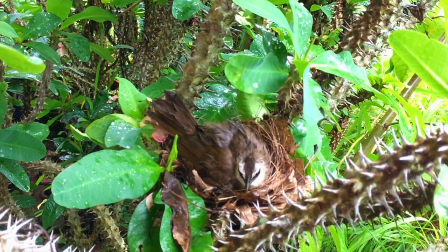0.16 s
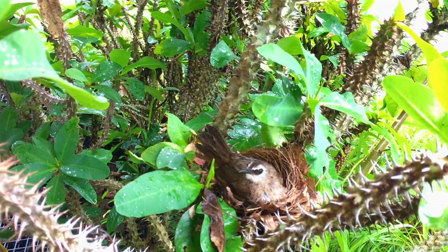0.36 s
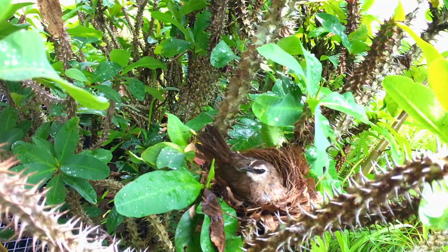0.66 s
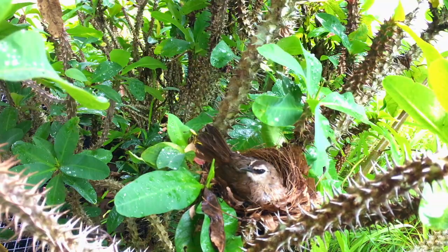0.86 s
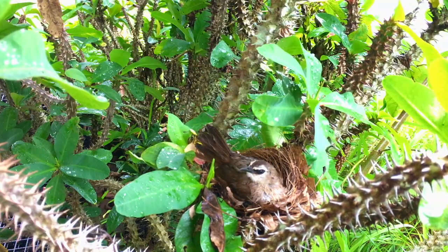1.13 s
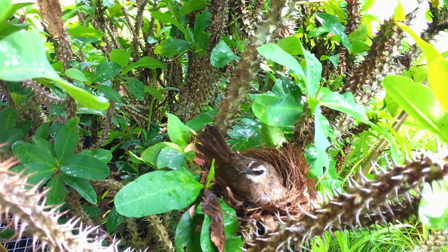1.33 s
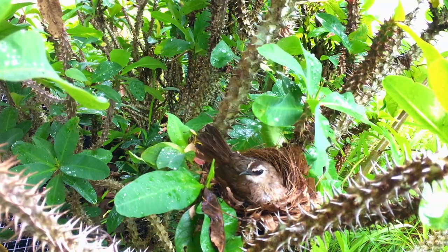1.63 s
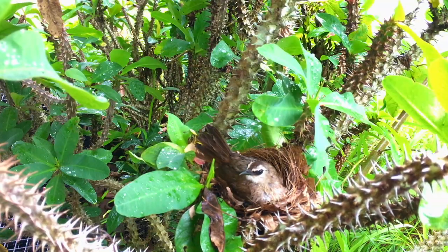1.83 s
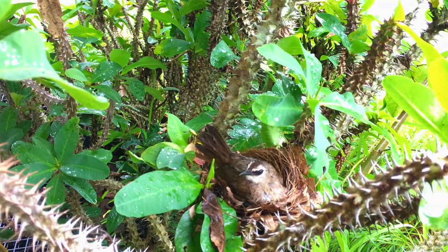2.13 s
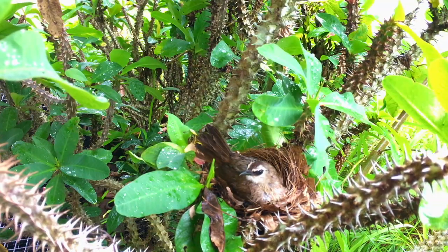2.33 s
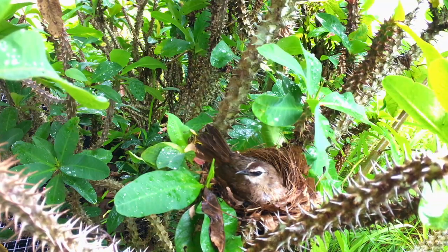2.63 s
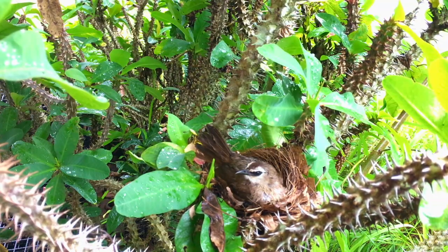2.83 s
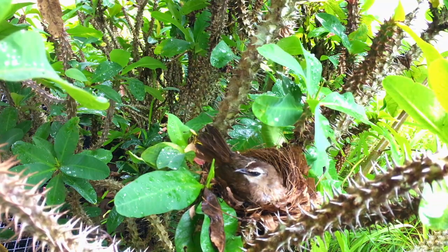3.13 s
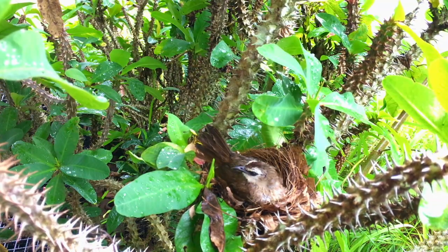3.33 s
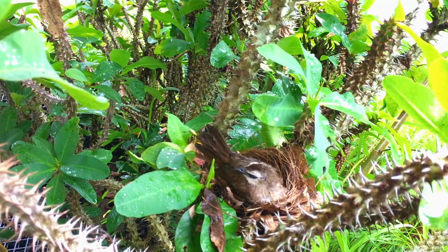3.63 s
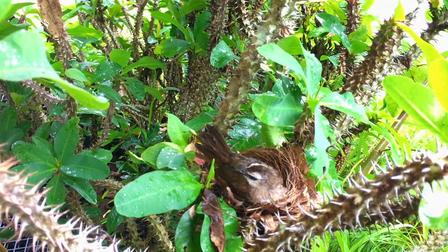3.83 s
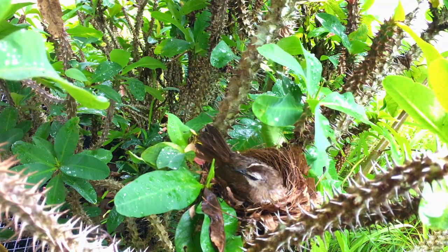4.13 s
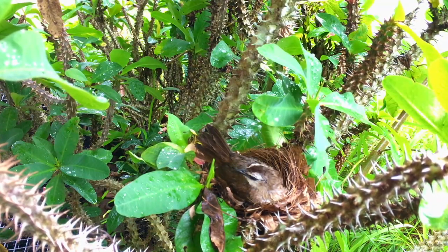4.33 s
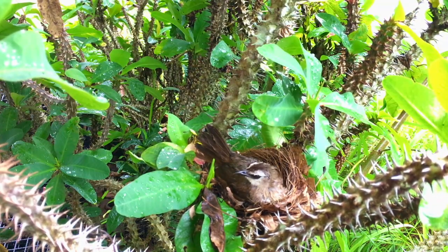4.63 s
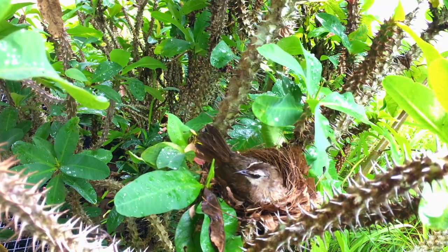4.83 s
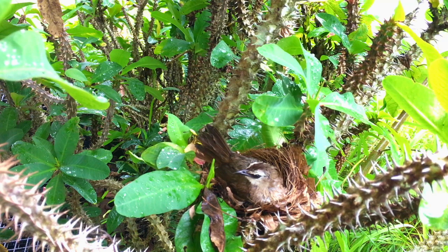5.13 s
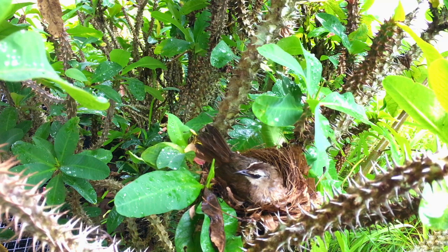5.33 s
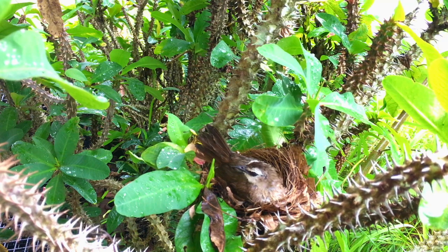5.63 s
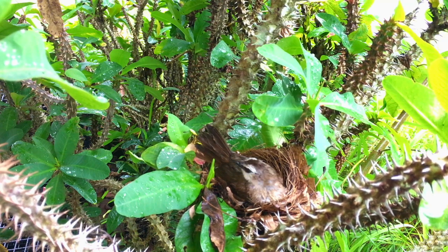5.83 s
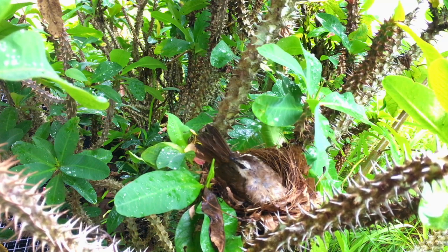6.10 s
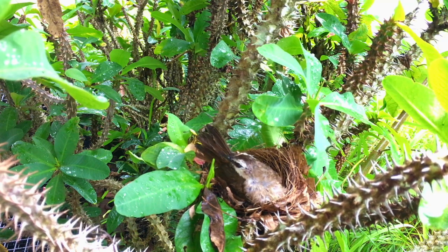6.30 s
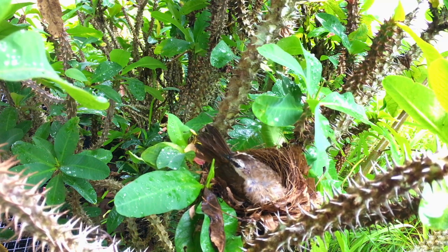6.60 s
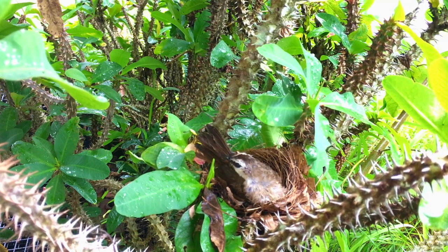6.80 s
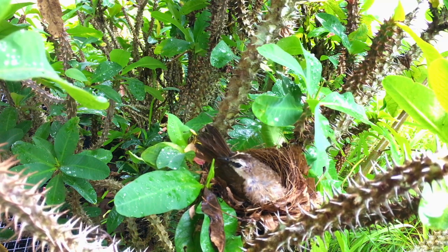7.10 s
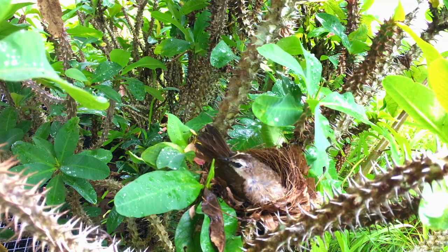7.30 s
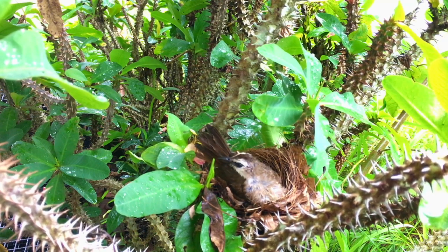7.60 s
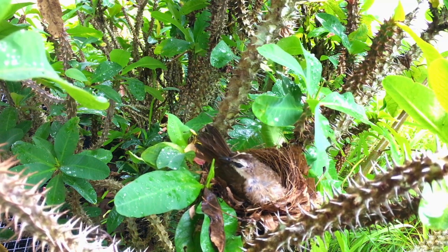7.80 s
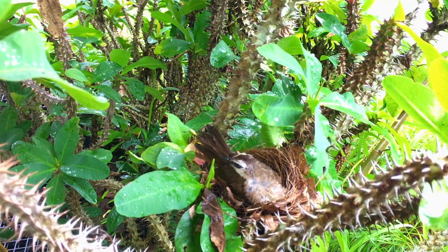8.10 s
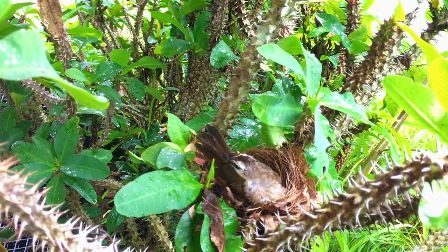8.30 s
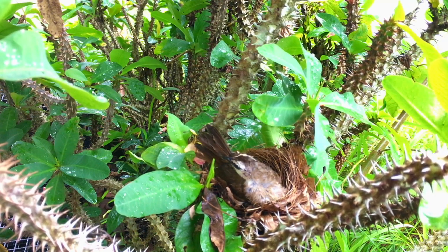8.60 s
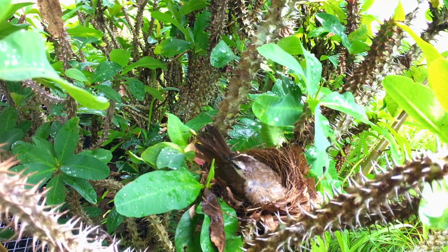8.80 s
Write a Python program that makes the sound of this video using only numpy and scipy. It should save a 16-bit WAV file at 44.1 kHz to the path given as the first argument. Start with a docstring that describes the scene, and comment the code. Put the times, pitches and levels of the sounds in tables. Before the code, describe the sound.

A microphone close among wet foliage picks up continuous rain: fine airy hiss, many tiny patters, and sharper nearby drops cracking on single leaves. Heavier drips thump softly at random. Far low town rumble stays faint underneath. Every couple of seconds a small distant bird slides up to a short piercing whistle; a rough, throaty double rasp closes the scene.

```python
"""Steady rain on a leafy shrub, heard from close by: a bright hiss over a low town rumble, with ticks and thuds.
Near drops tick on single leaves as a damped ring, a burst of spray noise and an after-patter; fat drips thud
on the ground and stems as short low swings. Far rain and rumble are shaped noise with slow level changes.
A small bird some way off whistles as gliding sines, and noise through throat resonances rasps at the end."""
import sys
import numpy as np
from scipy import signal
from scipy.fft import rfft, irfft
from scipy.io import wavfile
from scipy.ndimage import uniform_filter1d

SR = 44100
rng = np.random.default_rng(int(sys.argv[2]) if len(sys.argv) > 2 else 0)


def boost_factor(decibels):
    """Convert a level in decibels to a linear amplitude factor."""
    exponent = np.asarray(decibels, float) / 20
    return 10 ** exponent


def put_to_file(sound):
    """Save the sound as 16-bit audio at rate SR, in the file named by the first command-line argument."""
    columns = np.atleast_2d(sound).T  # one column per channel
    safe = np.clip(columns, -1, 1)
    whole_steps = np.round(safe * 32767)
    wavfile.write(sys.argv[1], SR, whole_steps.astype(np.int16))


N = 394694

# level changes of the far rain and of the middling drops: start_s, far_rain_db, middling_change_db
RAIN_LEVELS = [(0.0, -40.5, 7.5), (0.6, -42.5, -4), (0.84, -42.5, 3.5), (1.67, -41.5, -1), (1.89, -41.5, 5),
               (2.24, -42.5, -1), (3.01, -39, 13), (3.21, -41.5, -5), (4.29, -43.5, 0), (4.56, -42, 1),
               (4.86, -43.5, 2), (5.41, -42, 0), (6.61, -43, 0.5), (6.93, -40.5, 0.5), (7.53, -40, 0),
               (7.85, -42, 0), (8.2, -41, 0), (8.6, -43.5, -5.5), (8.95, -40.5, -1)]
# colour of the hiss as the microphone hears it, shared by far and near rain: frequency_hz, relative_density_db
HISS_COLOUR = [(320, -113), (540, -10), (650, -7), (1010, -3), (1430, -4), (3280, -0.5), (4820, -4),
               (6510, 0.5), (7620, -2.5), (9440, 0), (10400, -4), (12400, 1.5), (14700, -1.5), (15700, -2),
               (16500, -13.5)]
SPLASH_S = 0.08  # room for each short sound


def response(points, f):
    """Frequency response: gain at f Hz, interpolated in dB over log frequency."""
    hz, db = np.transpose(points)
    return boost_factor(np.interp(np.log(f + 1), np.log(hz), db))


def coloured(points):
    """Spectral shaping: white noise weighted by the given spectrum, at rms 1."""
    gain = response(points, np.fft.rfftfreq(N, 1 / SR))
    x = irfft(rfft(rng.standard_normal(N)) * gain, N)
    return x / np.std(x)


def walk(rate):
    """Slow random modulation: levels held 1 / rate s and smoothed twice; spread 1."""
    k = int(SR / rate)
    steps = np.repeat(rng.standard_normal(N // k + 1), k)
    x = uniform_filter1d(uniform_filter1d(steps, k), k)[:N]
    return x / np.std(x)


def fade(t, t60):
    """Exponential damping: a fall of 60 dB in t60 s."""
    return np.exp(-np.log(1000) * t / t60)


def scatter(s, sounds):
    """Superposition: each short sound is added in at its own time."""
    at = (np.asarray(s) * SR).astype(int)[:, None] + np.arange(sounds.shape[1])
    return np.bincount(at.ravel(), sounds.ravel(), N + SR)[:N]


def filtered(noise, gain):
    """Linear filtering: each row of noise takes its own gain over frequency, at rms 1."""
    x = irfft(rfft(noise) * gain, noise.shape[1])
    return x / np.std(x, axis=1, keepdims=True)


def lumps(rows, size, count, db):
    """Random unevenness: per row a smooth gain with count lumps, spread db at the knots; mean power 1."""
    knots = rng.standard_normal((rows, count + 1))
    at = np.linspace(0, count, size, endpoint=False)
    k = at.astype(int)
    gain = boost_factor(db * (knots[:, k] * (1 - at + k) + knots[:, k + 1] * (at - k)))
    return gain / np.sqrt(np.mean(gain ** 2))


def far_rain():
    """Incoherent summation: countless distant drops merge into a hiss that flickers with gusts of rain."""
    s, db, _ = np.transpose(RAIN_LEVELS)
    flicker_db = 0.8 * walk(16)
    return coloured(HISS_COLOUR) * boost_factor(np.interp(np.arange(N) / SR, s, db) + flicker_db)


def rumble():
    """Low-pass propagation: of distant traffic and rain on roofs, only the bass arrives."""
    # slow swell: start_s, level_db
    town_swell = [(0, -55), (4, -53.5), (8.95, -54)]
    # colour of the rumble: frequency_hz, relative_density_db
    town_colour = [(21, -36), (36, -10), (60, 2), (86, 0.5), (150, -7.5), (520, -18), (680, -31),
                   (1140, -120)]
    s, db = np.transpose(town_swell)
    return coloured(town_colour) * boost_factor(np.interp(np.arange(N) / SR, s, db))


def thud(s, db, hz, decay_s):
    """Heavily damped resonance: a soft contact gives a few low swings that soon blur into noise."""
    t = np.arange(int(SPLASH_S * SR)) / SR
    f = np.fft.rfftfreq(len(t), 1 / SR)
    hz = hz[:, None]
    resonance = 1 / (1 + (1.17 * (f / hz - hz / (f + 1))) ** 2)
    wobble = filtered(rng.standard_normal((len(s), len(t))), resonance)
    tone = np.sin(2 * np.pi * hz * t) * fade(t, 0.81 * decay_s)
    swing = tone + boost_factor(-5.0) * wobble * fade(t, 3.6 * decay_s)
    onset = 1 - np.exp(-t / 0.00022)  # swells within about a millisecond
    return scatter(s, boost_factor(db)[:, None] * swing * onset * (1 - t / SPLASH_S))


def drips():
    """Impact response: fat drips close by over a soft thump of the ground, and a crowd of fainter ones."""
    # the loudest fat drips: start_s, level_db, pitch_hz
    fat_drips = [(0.024, -44, 720), (0.366, -32, 925), (0.601, -41.5, 940), (1.244, -32, 920),
                 (1.416, -34.5, 931), (1.568, -34.5, 1610), (1.669, -39, 1330), (1.791, -32, 845),
                 (1.838, -36.5, 1620), (1.87, -43, 1570), (2.393, -41, 1460), (2.716, -42, 1120),
                 (2.963, -39, 649), (3.05, -40, 1340), (3.167, -37.5, 1560), (3.254, -38.5, 1060),
                 (3.542, -38, 622), (3.957, -37, 960), (4.251, -35, 920), (4.385, -37, 1030),
                 (4.425, -35, 880), (4.664, -39, 875), (4.816, -38, 1000), (5.119, -40, 860),
                 (5.227, -42, 910), (5.353, -39, 1020), (5.479, -29.5, 660), (5.541, -35.5, 1120),
                 (5.653, -35.5, 1020), (5.836, -38, 1060), (6.473, -37, 900), (6.612, -37, 654),
                 (7.046, -36, 700), (7.801, -37, 1010), (7.823, -38.5, 1080), (8.139, -33, 1550),
                 (8.569, -40.5, 894), (8.641, -38, 872), (8.839, -37, 1020), (8.901, -32.5, 1530),
                 (8.926, -36, 1200)]
    crowd_size = 500
    thump_hz, thump_db, thump_decay_s = 290, -15, 0.043  # lowest-to-highest scatter is drawn around these
    s, db, hz = np.transpose(fat_drips)
    u = rng.random((crowd_size, 2)).T
    e = rng.exponential(1, crowd_size)
    crowd_db = -51 + 2.5 * np.minimum(e, 3.0)
    crowd = thud(u[0] * N / SR, crowd_db, 640 * 2.35 ** u[1], 0.027)
    g = rng.standard_normal((len(s), 2)).T
    # each thump has its own level against the drip and its own pitch
    thump = thud(s, db + thump_db + 3.8 * g[0], thump_hz * 1.2 ** g[1], thump_decay_s)
    high_pass = signal.butter(4, 570, "high", fs=SR, output="sos")
    return signal.sosfilt(high_pass, thud(s, db, hz, 0.024) + crowd) + thump


def splash(s, hz, ring_db, spray_db, fine_db, patter_db, hit_t60, patter_t60, q):
    """Impact excitation: a drop jolts the leaf, which rings briefly; water bursts into spray and patters after."""
    spray_from_hz, fine_from_hz, fine_top_hz = 4500, 9050, 16000
    t = np.arange(int(SPLASH_S * SR)) / SR
    f = np.fft.rfftfreq(len(t), 1 / SR)
    hz = hz[:, None]
    noise = rng.standard_normal((len(s), len(t)))
    # a sharp crack at first contact, then the water spreads
    hit = (fade(t, hit_t60) + boost_factor(-3) * fade(t, 0.003)) * (1 - np.exp(-t / 0.0001))
    patter = boost_factor(patter_db)[:, None] * fade(t, patter_t60) * (1 - t / SPLASH_S) * (1 - np.exp(-t / 0.0027))
    # droplets fall back unevenly, coarse and fine ones at their own moments
    coarse, medium, mist = (np.hypot(hit, patter * lumps(len(s), len(t), count=48, db=1.5)) for _ in range(3))
    # every splash has its own patchy colour on top of the microphone's shared colour
    colour = response(HISS_COLOUR, f) * lumps(len(s), len(f), count=16, db=2.8)
    # the membrane's first swings are clean, then the wet surface blurs them
    clean = np.exp(-t * hz / 1.6)
    resonance = 1 / np.hypot(1, q * (f / hz - hz / (f + 1)))
    flutter = filtered(noise, colour * (f < spray_from_hz) * resonance)
    snap = boost_factor(9.0) * np.sin(2 * np.pi * hz * t) * clean
    leaf = snap + boost_factor(-1.0) * flutter * np.sqrt(1 - clean ** 2) * coarse
    spray = filtered(noise, colour * (f > spray_from_hz) * (f < fine_from_hz)) * medium
    fine = filtered(noise, colour * (f > fine_from_hz) * (f < fine_top_hz)) * mist
    ring_gain, spray_gain, fine_gain = (boost_factor(db)[:, None] for db in (ring_db, spray_db, fine_db))
    out = scatter(s, ring_gain * leaf + spray_gain * spray + fine_gain * fine)
    # a leaf is too small to radiate bass
    return signal.sosfilt(signal.butter(3, 1450, "high", fs=SR, output="sos"), out)


def patter_of(ring_db, spray_db, fine_db):
    """Compressive scaling: the harder the impact, the further its after-patter stays below it."""
    patter_db, reference_db, spread_db = -2.5, -33.5, 1.5
    slope = 0.37  # dB lost for each dB louder than the reference
    loudest = np.max([ring_db, spray_db, fine_db], axis=0)
    return patter_db - slope * (loudest - reference_db) + spread_db * rng.standard_normal(len(loudest))


def near_drops():
    """Random arrivals on the closest leaves: the loudest drops amid middling ones, louder and softer by turns."""
    # the loudest near drops: start_s, pitch_hz, ring_db, spray_db, fine_spray_db
    loud_drops = [(0.089, 2900, -35, -53, -49), (0.1125, 2950, -37, -23, -11.5),
                  (0.1398, 4600, -39, -30, -25), (0.227, 4370, -38, -50, -36),
                  (0.3371, 2390, -22.5, -28.5, -29), (0.3783, 2190, -51, -46, -35),
                  (0.4024, 2720, -30.5, -27, -28), (0.5076, 1590, -51, -49, -37),
                  (0.5944, 3470, -33.5, -30.5, -45), (0.627, 3750, -40, -30, -29),
                  (0.6536, 3710, -53, -45, -35), (0.7133, 4100, -51, -35, -28),
                  (0.721, 3300, -30, -30, -35), (0.8438, 2060, -40, -42, -35), (0.86, 4600, -42, -33, -47),
                  (0.8764, 2240, -51, -50, -34), (0.8957, 3010, -31.5, -32.5, -31),
                  (0.9331, 3390, -37, -34, -33), (1.0038, 3400, -41, -41, -39),
                  (1.0226, 3400, -56, -28, -30), (1.1237, 3850, -32, -36, -41),
                  (1.1407, 3380, -34, -28, -27), (1.2221, 4090, -34, -27, -28),
                  (1.3099, 3990, -44, -34, -28), (1.3837, 4180, -35, -34, -27.5),
                  (1.4253, 1890, -38.5, -31.5, -43), (1.4552, 3760, -27, -34, -33),
                  (1.5071, 2940, -42, -44, -34), (1.5628, 2540, -40, -38, -34),
                  (1.6436, 3250, -35.5, -30, -30), (1.6916, 4440, -34, -34, -38),
                  (1.7006, 4010, -39, -35, -25), (1.722, 2600, -37, -50, -58),
                  (1.7654, 3710, -53, -52, -39), (1.789, 2810, -39, -29.5, -33),
                  (1.8253, 3790, -31, -32, -29), (1.8392, 1550, -33, -50, -46),
                  (1.8488, 3220, -38, -32, -38), (1.9496, 4530, -30.5, -32, -28),
                  (2.054, 3320, -30, -36, -23), (2.0756, 4520, -48, -39, -33),
                  (2.2069, 3230, -46, -34, -32), (2.3171, 3030, -41, -37, -35),
                  (2.323, 3550, -53, -29, -44), (2.3467, 4480, -40, -37, -24),
                  (2.3728, 4470, -55, -39, -43), (2.4567, 4480, -47, -35, -30),
                  (2.478, 4510, -44, -36, -30), (2.5164, 3750, -40, -36, -31),
                  (2.5489, 3340, -35, -32, -33), (2.5739, 3720, -33, -25.5, -28),
                  (2.6935, 3230, -40, -41, -49), (2.738, 2150, -52, -38, -34.5),
                  (2.7944, 3780, -50, -43, -32), (2.8556, 4000, -34, -39, -31),
                  (2.8757, 1610, -47, -49, -27), (2.9555, 3430, -39, -30, -41),
                  (2.9853, 2420, -27.5, -31, -38), (3.0468, 3330, -45, -33, -46),
                  (3.068, 3020, -30.5, -36, -42), (3.1096, 3120, -36, -36, -34),
                  (3.1194, 2360, -49, -31, -37), (3.1645, 2160, -37, -43, -38),
                  (3.2009, 3870, -35, -35, -26), (3.2089, 3430, -33.5, -36, -42),
                  (3.3763, 3360, -35, -35, -42), (3.4025, 4340, -39, -35, -27),
                  (3.5295, 3840, -39, -29, -25.5), (3.7185, 3470, -34, -41, -26),
                  (3.7389, 3990, -50, -39, -46), (3.7888, 4030, -26.5, -46, -47),
                  (3.8233, 3690, -36, -34, -32), (3.9768, 3380, -43, -34, -36),
                  (4.0025, 2430, -33, -46, -45), (4.1084, 3700, -33, -34, -30),
                  (4.1995, 3360, -41, -37, -34), (4.2649, 3300, -41, -54, -41),
                  (4.4319, 4360, -46.5, -35, -27), (4.4449, 3250, -36, -45, -41),
                  (4.4939, 1890, -48, -41, -33), (4.5985, 4290, -41.5, -44, -37),
                  (4.6318, 2360, -46, -34, -44), (4.6499, 3780, -34.5, -38, -44),
                  (4.6747, 3410, -36, -32, -29), (4.7133, 3070, -30, -46, -38),
                  (4.8807, 3360, -35, -35, -38), (4.8962, 4040, -42, -38, -44),
                  (5.0555, 4350, -40, -31, -30), (5.0799, 3810, -37, -49, -31),
                  (5.2212, 2790, -53, -30, -29), (5.2928, 4050, -50, -32.5, -40),
                  (5.2996, 3120, -50, -45, -27.5), (5.3787, 4310, -40, -36, -33),
                  (5.445, 3380, -47, -30, -28), (5.4559, 3480, -28.5, -23, -22),
                  (5.491, 3460, -38, -33, -30), (5.599, 1690, -54, -31, -36),
                  (5.6285, 4120, -33.5, -33, -39), (5.6626, 2880, -32.5, -32, -34),
                  (5.8217, 1830, -52, -31, -39), (5.8676, 3390, -49, -37, -32),
                  (5.8932, 4230, -48, -31, -37), (6.0591, 3330, -49, -44, -35),
                  (6.0682, 3260, -53, -33, -34), (6.1457, 4430, -51, -30.5, -29),
                  (6.1678, 2270, -24.5, -34, -28), (6.2783, 3330, -33.5, -36, -32),
                  (6.3511, 4340, -58, -41, -32), (6.3625, 3100, -39, -54, -46),
                  (6.4125, 2940, -47, -35, -43), (6.4472, 3710, -40.5, -47, -38),
                  (6.5093, 4500, -48, -40, -33), (6.592, 4050, -45, -29.5, -25),
                  (6.7485, 4050, -39, -37, -39), (6.7812, 3410, -37, -26, -22),
                  (6.8116, 4520, -45, -28, -17), (6.8849, 2510, -29, -25.5, -27.5),
                  (6.9908, 2970, -37, -27, -39), (6.9978, 4050, -31, -25.5, -25),
                  (7.0128, 2250, -35, -42, -46), (7.0478, 2610, -39, -32, -25.5),
                  (7.0801, 2890, -32, -30, -26), (7.1738, 3620, -52, -35, -33),
                  (7.218, 3220, -47, -32, -31), (7.3101, 3340, -38, -33, -31),
                  (7.3505, 3390, -26, -32, -30.5), (7.416, 3500, -34, -32.5, -35),
                  (7.4671, 3220, -33, -32, -46), (7.5514, 4280, -30.5, -33, -31),
                  (7.6175, 4300, -32, -35, -50), (7.6995, 2600, -35.5, -31, -34),
                  (7.7169, 2070, -28.5, -44, -43), (7.7507, 2870, -38, -32.5, -35),
                  (7.7563, 2430, -32.5, -27, -29), (7.9218, 4050, -30.5, -32, -25),
                  (8.0408, 4060, -39, -44, -35), (8.0508, 3370, -37, -33, -29),
                  (8.0647, 3780, -53, -38, -30), (8.0924, 3330, -31, -46, -41),
                  (8.1402, 2800, -16.5, -21, -23), (8.1639, 3590, -28, -36, -42),
                  (8.2281, 3320, -32.5, -41, -36), (8.2659, 3450, -39, -31, -27.5),
                  (8.3171, 4530, -50, -32, -34), (8.364, 2670, -40, -36, -25.5),
                  (8.3752, 3500, -31.5, -38.5, -43), (8.3818, 3680, -35, -42, -35),
                  (8.3889, 4430, -37, -24.5, -46), (8.4087, 4330, -51, -33, -31),
                  (8.4314, 3150, -37, -35, -31), (8.5691, 4600, -29, -36, -34),
                  (8.6075, 4460, -39, -32, -31), (8.626, 2440, -55, -37, -25.5),
                  (8.6634, 3340, -49, -38, -33), (8.7633, 3780, -35, -31, -35),
                  (8.7767, 2920, -39.5, -46, -46), (8.8106, 3570, -50, -34, -46),
                  (8.8595, 1650, -38, -33, -32), (8.901, 1530, -48, -35, -35),
                  (8.9137, 2230, -32.5, -49, -38)]
    crowd_size, low_hz, high_hz = 260, 1730, 4600
    # middling drops a little further off: ring, spray, fine spray
    middle_db, spread_db = np.array((-45.5, -42.5, -37)), np.array((4.5, 6.5, 2))
    u = rng.random((crowd_size, 2)).T
    g = rng.standard_normal((crowd_size, 3))
    s = u[0] * N / SR
    at, _, change_db = np.transpose(RAIN_LEVELS)
    db = middle_db + spread_db * np.minimum(g, 1) + np.interp(s, at, change_db)[:, None]
    crowd = np.column_stack([s, low_hz * (high_hz / low_hz) ** u[1], db])
    s, hz, ring_db, spray_db, fine_db = np.vstack([loud_drops, crowd]).T
    patter_db = patter_of(ring_db, spray_db, fine_db)
    return splash(s, hz, ring_db, spray_db, fine_db, patter_db, hit_t60=0.025, patter_t60=0.1, q=4.2)


def small_drops():
    """Random arrivals further back: many fainter drops, each leaf with its own pitch and wetness."""
    count = 2600
    u = rng.random((count, 3)).T
    e = rng.exponential(1, count)
    g = rng.standard_normal((count, 3)).T
    db = -52.5 + 2.4 * np.minimum(e, 3.5)
    hz = 1400 * 4.5 ** u[1]
    ring_db = db - 3 + 4 * g[0]
    spray_db = db + 4 * g[1]
    fine_db = db + 3.5 + 3.54 * g[2]
    patter_db = -4 - 16 * u[2]
    return splash(u[0] * N / SR, hz, ring_db, spray_db, fine_db, patter_db, hit_t60=0.03, patter_t60=0.029, q=1.1)


def bird():
    """Frequency and amplitude modulation: thin whistles slide up to a held note that throbs and lingers."""
    # chirps: start_s (of the held note), pitch_hz (held), level_db
    whistles = [(.96, 6500, -49), (2.672, 6240, -42), (4.515, 6070, -44), (5.815, 6220, -42.5),
                (7.558, 6130, -40)]
    lead_s = 0.03  # the slide comes before the held note
    t = np.arange(int(0.2 * SR)) / SR - lead_s
    s, hz, db = np.transpose(whistles)
    slide = 0.12 * np.clip(-t / 0.025, 0, 1)
    pitch = hz[:, None] * (1 - slide + 0.011 * walk(160)[:len(t)])
    swell = np.where(t < 0, np.exp(t / 0.009), fade(np.maximum(t, 0), 0.9))
    shape = swell * np.clip((0.13 - t) / 0.05, 0, 1)
    notes = np.sqrt(2) * boost_factor(db)[:, None] * shape * np.sin(2 * np.pi * np.cumsum(pitch, axis=1) / SR)
    # random throbbing stands for echoes among the leaves
    return scatter(s - lead_s, notes * lumps(len(s), len(t), count=24, db=4.0))


def rasps():
    """Source and filter: lumpy noise through a few throat resonances, starting abruptly."""
    # two hoarse bursts some way off, perhaps a larger bird: start_s, hold_s (before the fall), level_db
    bursts = [(8.85, 0.022, -40), (8.898, .06, -44)]
    # resonances of the throat: frequency_hz, width_hz, gain_db
    throat_modes = [(1050, 93, 9), (1550, 280, -10), (2420, 600, -0.5)]
    s, hold_s, db = np.transpose(bursts)
    t = np.arange(int(SPLASH_S * SR)) / SR
    f = np.fft.rfftfreq(len(t), 1 / SR)
    throat = sum(boost_factor(gain_db) / (1 + ((f - hz) / (width / 2)) ** 2) for hz, width, gain_db in throat_modes)
    shape = np.clip(t / 0.002, 0, 1) * np.clip((hold_s[:, None] - t) / 0.019 + 1, 0, 1)
    noise = filtered(rng.standard_normal((len(s), len(t))), throat)
    rough = noise * lumps(len(s), len(t), count=12, db=4.0)
    return scatter(s, boost_factor(db)[:, None] * shape * rough)


def scene():
    """Linear superposition: all sources add at one microphone."""
    return (near_drops() + small_drops() + drips() + far_rain() + rumble() + bird() + rasps())[None]


def top_cut(x):
    """Nothing passes above the cut-off."""
    return signal.sosfilt(signal.butter(12, 17010, fs=SR, output="sos"), x)


def record(dry):
    """Band limiting: the recorder cuts the top steeply above 15.75 kHz."""
    low_pass = signal.ellip(8, 0.2, 30, 15750, fs=SR, output="sos")
    mix = signal.sosfilt(low_pass, dry)
    return top_cut(mix)


dry = scene()
out = record(dry)
put_to_file(out)
```